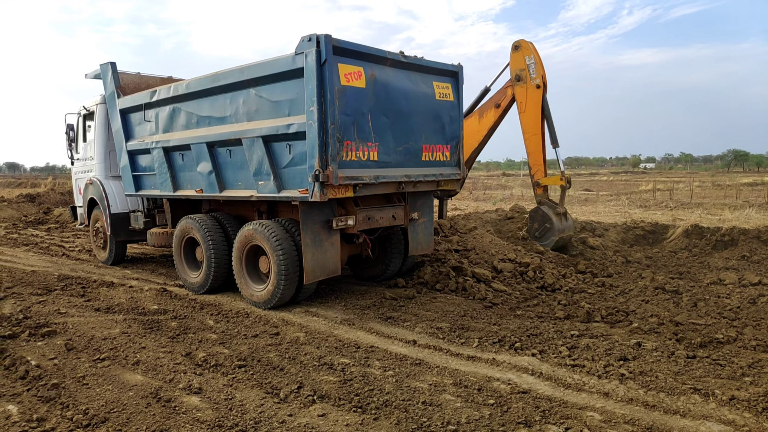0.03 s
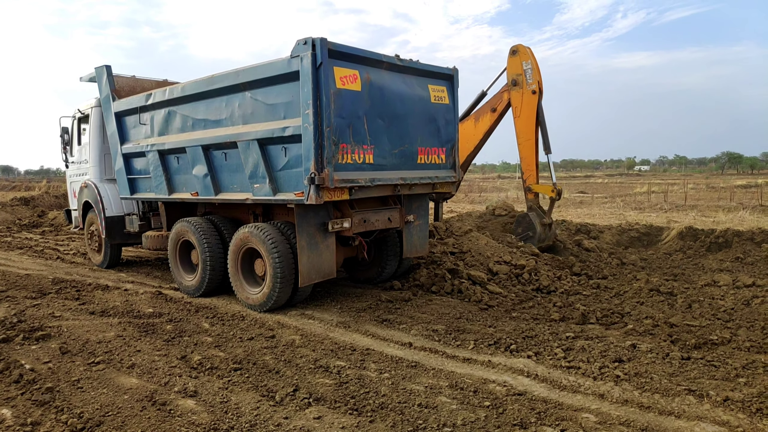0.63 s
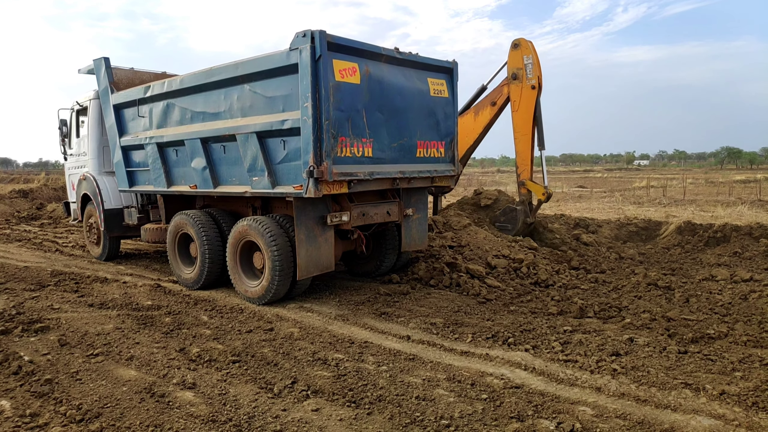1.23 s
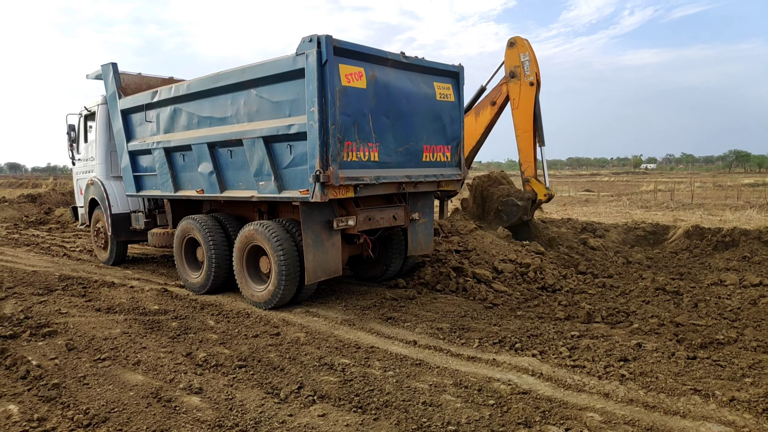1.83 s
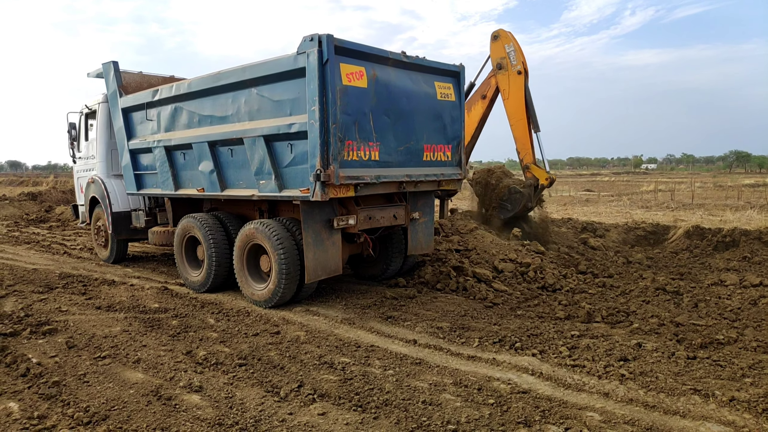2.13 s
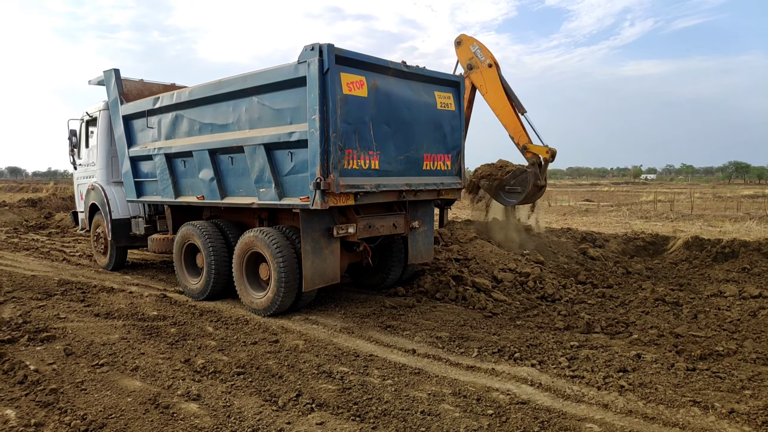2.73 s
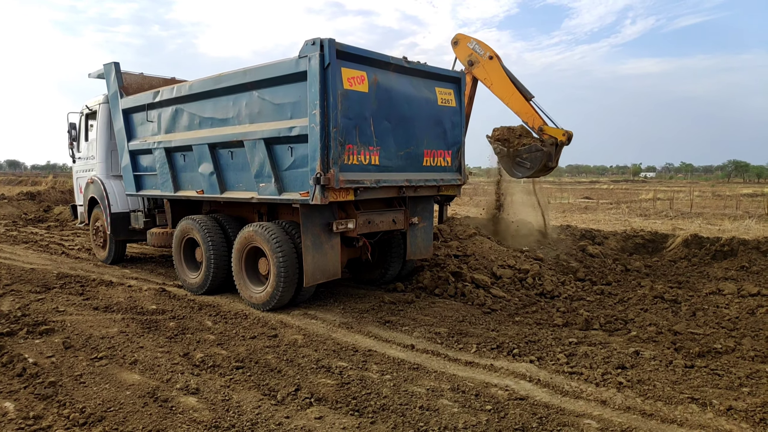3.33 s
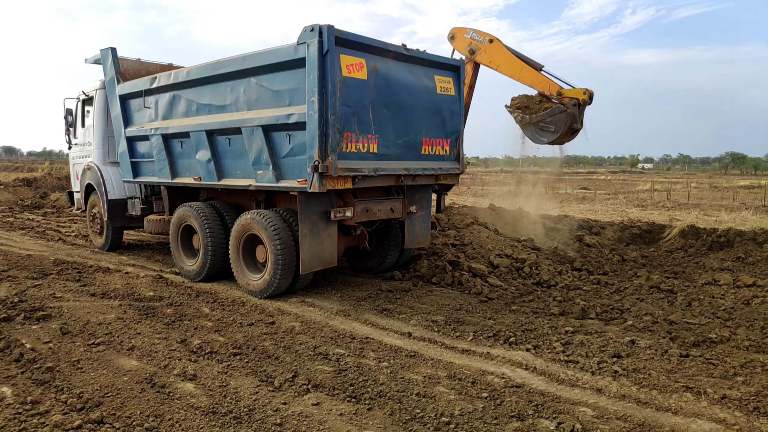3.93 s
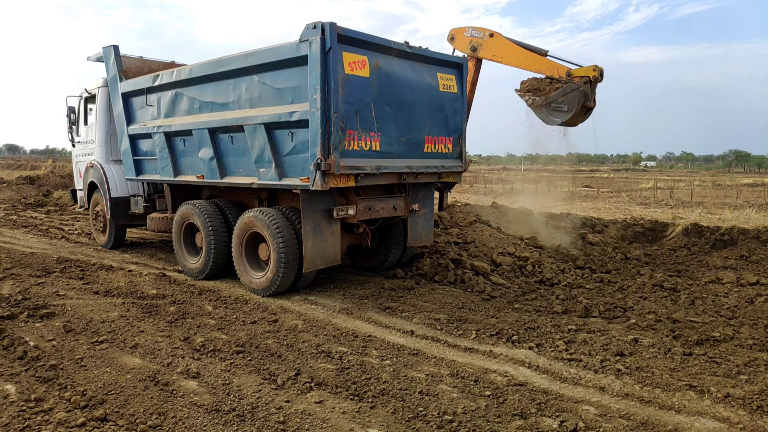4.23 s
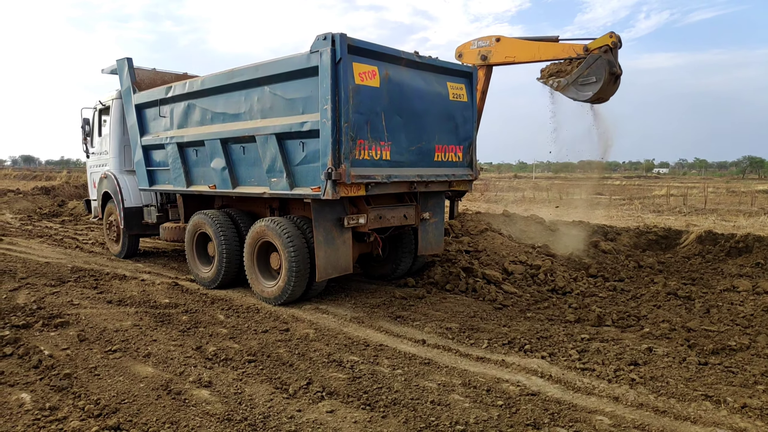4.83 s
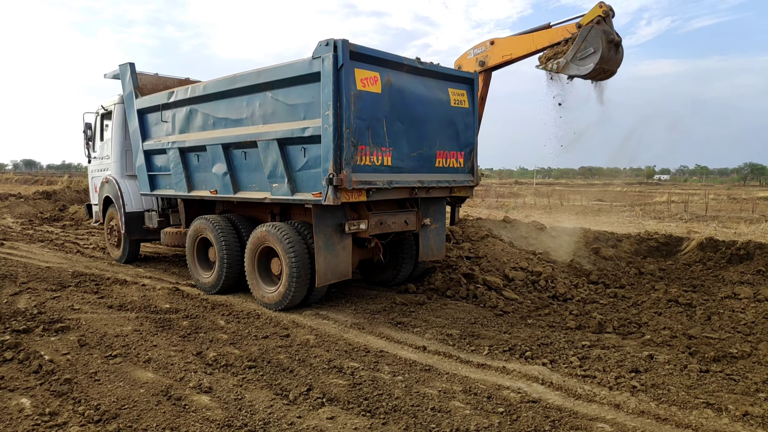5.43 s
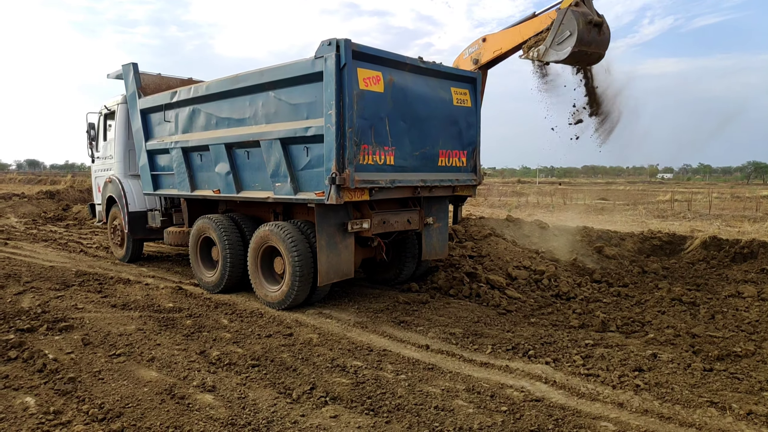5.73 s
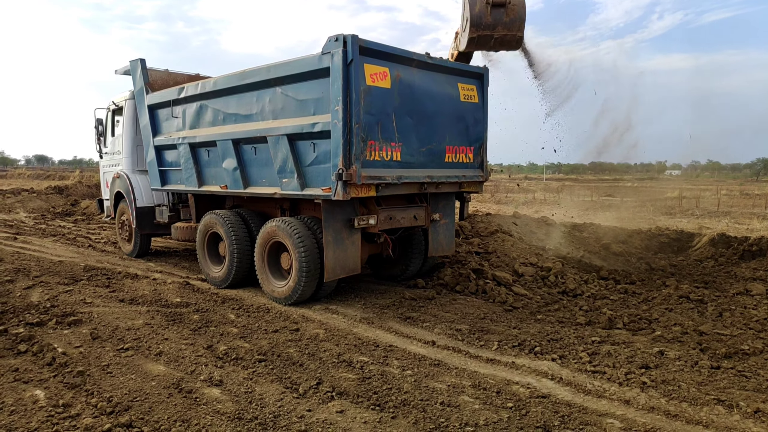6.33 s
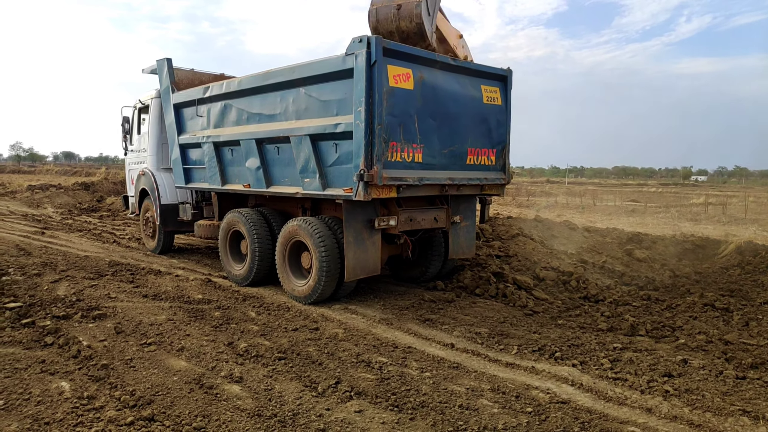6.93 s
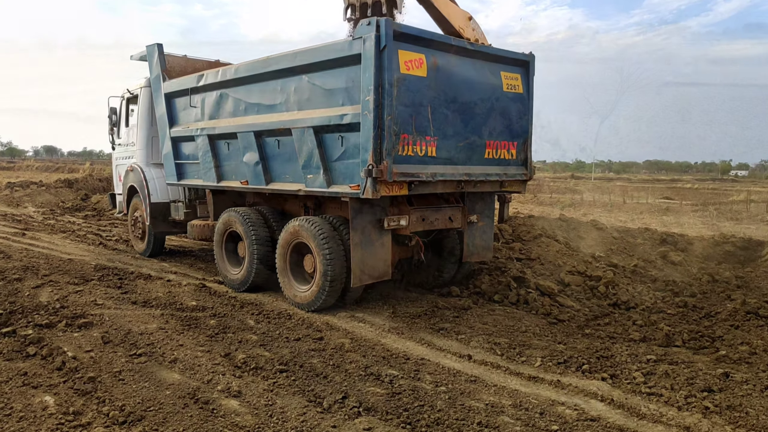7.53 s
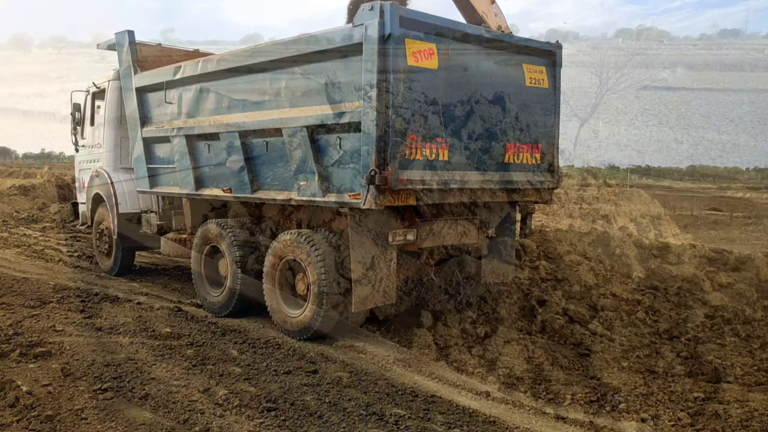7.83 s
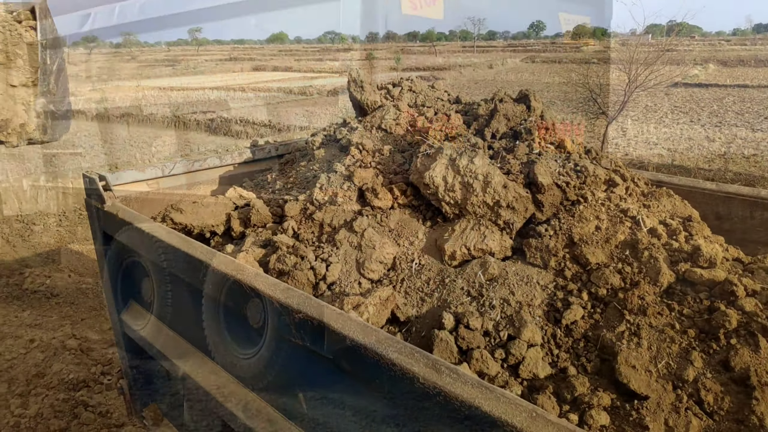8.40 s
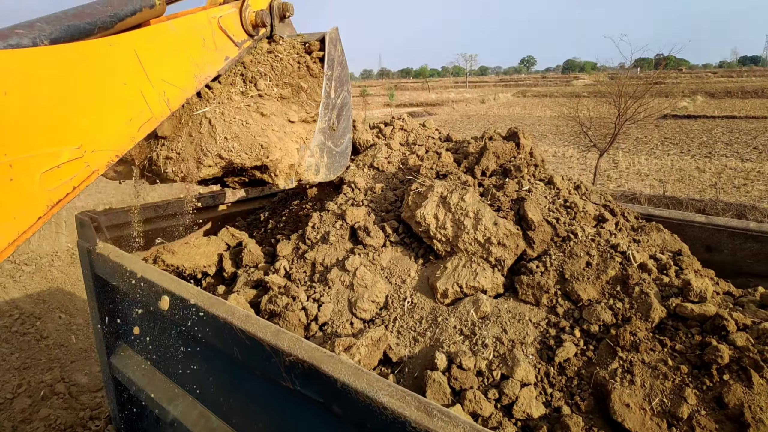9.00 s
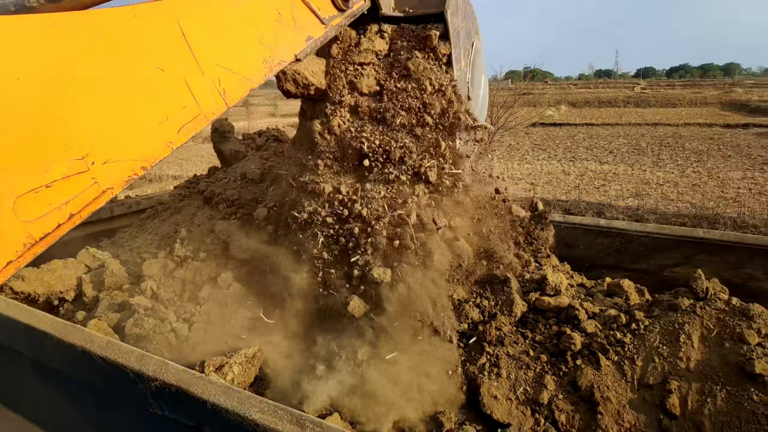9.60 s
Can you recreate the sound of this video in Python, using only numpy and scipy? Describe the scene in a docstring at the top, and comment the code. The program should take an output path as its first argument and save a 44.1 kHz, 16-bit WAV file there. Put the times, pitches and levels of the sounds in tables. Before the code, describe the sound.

A backhoe's diesel engine rumbles throughout, heard at first from a distance in an open field, slowing slightly and clattering harder whenever it takes a load. A faint hydraulic hiss runs underneath, and wind gusts buffet the microphone, most often between 4 and 7 seconds. Two short pivot squeaks come in the first second. The steel bucket knocks at about 2.2 and 2.5 seconds, then more lightly around 3.6. The engine labours from 6 seconds, with a clank near 6.6 and a soft trickle of dust and dirt. From about 7.6 to 8.7 seconds the engine grows into a louder, close, throbbing roar, with a dull knock along the way. At about 9.2 seconds dry soil spatters onto the steel truck bed, followed by thudding clods and two sharp bucket knocks around 9.5.

```python
"""Backhoe loader tipping soil.

A governed four-cylinder diesel works in an open field, heard from behind a tipper truck. Each lever
pull sags its speed and hardens its clatter. The bucket knocks, soil spatters, pivots squeak, oil
hisses in the valves and wind buffets the microphone. Near the end the far sound gives way to the
roar beside the machine as it tips soil into the truck."""
import sys
import numpy as np
from scipy import signal
from scipy.fft import rfft, irfft, next_fast_len
from scipy.io import wavfile

SR = 44100
rng = np.random.default_rng(int(sys.argv[2]) if len(sys.argv) > 2 else 0)


def store_pcm(level_fs):
    """Save levels as 16-bit WAV."""
    pcm = np.round(np.clip(level_fs, -1, 1) * 32767).astype(np.int16)
    wavfile.write(sys.argv[1], SR, np.atleast_2d(pcm).T)


N = 426006
T = np.arange(N) / SR
PORT_LAG_S = (.00025, -.00023)  # engine at the left microphone port after the right: far, near


def exhaust(firings, shares, sag_hz, boom_db_per_hz=1.1, usual_sag_hz=1.26, flutter_per_order=.055):
    """Exhaust and shaft tones; no two firings are alike, and high orders waver most."""
    # firing_order, far_db, near_db
    tones = [(0.751, -43, -61), (1, -26.5, -18.5), (2, -31.5, -22.5), (2.75, -42, -56), (3, -34.5, -21),
             (3.25, -50, -30), (3.5, -39.5, -26), (3.75, -47.5, -34.5), (4, -52, -27), (4.251, -49, -59),
             (4.501, -58, -43), (6, -49, -26.5), (8.25, -56, -61), (8.501, -58, -58), (9.5, -76, -41.5)]
    out = np.zeros((2, N))
    firings = firings + .006 * drift(20)  # timing jitter
    for order, far_db, near_db in tones:
        level = blend(shares, far_db, near_db)
        # the governor answers sag with more fuel: the lowest tones swell
        boom = amp(boom_db_per_hz * (sag_hz - usual_sag_hz) / order)
        waver = 1 + flutter_per_order * order * drift(4.6)
        out += np.sqrt(2) * level * boom * waver * np.cos(2 * np.pi * (order * firings + rng.random()))
    return out


def roar(firings, shares, body_db=(-34, -19), hiss_db=(-51.5, -29)):
    """Fan and casing noise and intake and exhaust hiss throb with each firing; panels and pipes sing."""
    # freq_hz, far_density_db, near_density_db
    body_spectrum = [(30, -37, -12), (91, -3, -10.5), (224, -2, -4), (296, -5, -5.5), (419, -4, 1.5),
                     (440, -10.5, -0.5), (620, -6.5, -3.5), (750, -6.5, -7.5), (807, -13, -6.5),
                     (1420, -13.5, -7.5), (1665, -23, -14), (2320, -42, -23.5), (3250, -30.5, -25.5)]
    # freq_hz, far_density_db, near_density_db
    hiss_spectrum = [(1800, -14, 2.5), (2670, 2.5, -0.5), (3420, -3, -4.5), (4630, 0, -2),
                     (6030, -1.5, -3.5), (7200, -1, -6), (8500, -1, -7.5), (11100, -3, -6.5),
                     (14000, -5, -6)]
    # panel and pipe modes: freq_hz, width_hz, far_db, near_db
    panels = [(1023, 37, -51, -67), (1983, 270, -51, -37), (2506, 150, -58, -56), (3740, 43, -69.5, -53),
              (5260, 430, -84, -43), (7870, 1300, -66.5, -41)]
    body_throb, hiss_throb = (.15, .3), (.03, .19)  # depth: far, near
    out, beat = np.zeros((2, N)), np.cos(2 * np.pi * firings)
    body_noise, hiss_noise, panel_noise = air(N), rng.standard_normal((2, N)), air(N)
    for k, share in enumerate(shares):  # far, then near
        body = shaped(body_noise, lambda f: amp(colour(body_spectrum, f, k + 1)) / (1 + (f / 3400) ** 8))
        body = amp(body_db[k]) * unit(body) * (1 + body_throb[k] * beat)
        hiss = shaped(hiss_noise, lambda f: amp(colour(hiss_spectrum, f, k + 1)))
        hiss = amp(hiss_db[k]) * unit(hiss) * (1 + hiss_throb[k] * beat)
        rings = shaped(panel_noise, lambda f: sum(
            amp(db[k]) * np.sqrt(SR / 2 / width_hz) * peak(f, hz, width_hz)
            for hz, width_hz, *db in panels))
        left, right = body + hiss + rings
        out += share * np.array([np.roll(left, round(PORT_LAG_S[k] * SR)), right])
    return out * amp(.43 * drift(7))


def clatter(firings, shares, idle_db=-54.5, fuel_rise_db=14, full_fuel_hz=2.83, near_gain_db=11.5):
    """Each firing raps the block, harder with more fuel; the four cylinders rap unequally."""
    # block modes: freq_hz, width_hz, gain_db, extra_db_per_knock_db
    block_modes = [(1400, 105, 0, 0), (1510, 100, -1, .5)]
    cylinder_db, spread_db, cluster_db = (1, -1, .5, -.5), 1.7, 1.7
    jitter_s, port_jitter_s, rattle_cycles = .0016, .00011, .35
    onsets = np.flatnonzero(np.diff(firings.astype(int)))
    chance = rng.standard_normal((len(onsets), 4))
    force = amp(spread_db * chance[:, 0] + np.resize(cylinder_db, len(onsets)))
    raps = np.zeros((2, N))
    for port in range(2):
        late_s = jitter_s * chance[:, 1] + port_jitter_s * chance[:, port + 2]
        raps[port, np.clip(onsets + (late_s * SR).astype(int), 0, N - 1)] = force
    rattle = unit(air(N) * np.exp(-(firings % 1) / rattle_cycles))  # loose parts after each rap
    drive = (unit(raps) + .98 * rattle) * amp(cluster_db * drift(9.7))
    fuel = np.tanh(load_sag_hz(ramp_s=.19, lead_s=.059) / full_fuel_hz)  # moves ahead of the speed
    nearness_db = 20 * np.log10(shares[0] + amp(near_gain_db) * shares[1])
    knock_db = idle_db + fuel_rise_db * fuel + nearness_db
    ring, power = 0, 0
    for k, (hz, width_hz, db, brighten) in enumerate(block_modes):
        gain = amp(db + brighten * (knock_db - knock_db.mean()))  # louder knock favours the upper mode
        mode = unit(shaped(drive, lambda f: 1 / (1 + 1j * (f - hz) / width_hz) ** 2))
        ring += (-1) ** k * gain * mode
        power += gain ** 2
    return ring / np.sqrt(power) * amp(knock_db)


def load_sag_hz(ramp_s, lead_s=0):
    """Drop in firing rate as lever pulls load the engine; overlapping pulls add."""
    # start_s, end_s, sag_hz
    pulls = [(-.22, .59, 3.94), (1.96, 2.78, 1.55), (3.4, 5.8, 1.11), (4.61, 4.94, .83), (6.03, 6.67, 4.04),
             (7.19, 7.68, 3.42), (8.1, 10.45, 1.46), (8.61, 9.52, 2.43)]
    t = T + lead_s
    return sum(sag_hz * (np.tanh((t - start_s) / ramp_s) - np.tanh((t - end_s) / ramp_s)) / 2
               for start_s, end_s, sag_hz in pulls)


def fan(firings, shares, waver_db=2):
    """Blade tones of the belt-driven fan follow the engine speed."""
    # firing_order, far_db, near_db
    blade_tones = [(4.35, -46.5, -50), (8.7, -47.5, -38)]
    out = np.zeros((2, N))
    for order, far_db, near_db in blade_tones:
        level = blend(shares, far_db, near_db) * amp(waver_db * drift(2))
        out += np.sqrt(2) * level * np.sin(2 * np.pi * order * firings)
    return out


def bucket_knocks(ring_t60_s=.11, clang_t60_s=.06, tail_t60_s=.61, tail_db=-19, attack_s=.00063):
    """A crunch of contact rings the steel of bucket and linkage; the treble dies first."""
    # start_s, level_db, tilt_db_per_octave, clang_ratio
    knocks = [(.342, -41, 1.5, 0.64), (2.154, -28.5, -6.5, 0.56), (2.514, -33, 3, 0.98),
              (2.524, -25.5, -1.5, 0.56), (2.534, -29, -15, 0.32), (3.465, -47, -2, 0.45),
              (3.561, -33.5, -0.5, 0.49), (3.656, -32.5, 1, 0.43), (6.551, -38, -5, .1),
              (6.571, -25.5, 0, 1.5), (6.598, -31, -5, 0.33), (8.363, -26, -15, .2), (9.447, -21, 1, 0.3),
              (9.54, -22, -0.5, 0.28)]
    # freq_hz, width_hz, gain_db
    steel_modes = [(500, 84, -2), (716, 170, -0.5), (1060, 210, 4.5), (1506, 71, 5), (2026, 240, 6),
                   (3000, 350, -9), (3730, 320, -13), (5000, 1600, -10.5), (7200, 4100, -19),
                   (10800, 5100, -19)]
    out, t = np.zeros((2, N)), T[:SR // 2]
    tail = amp(tail_db - 60 * t / tail_t60_s)
    for start_s, db, tilt_db, clang_ratio in knocks:
        crunch, ring, clang = air(len(t)), 0, 0
        for hz, width_hz, mode_db in steel_modes:
            gain = amp(mode_db + tilt_db * np.log2(hz / 2000))
            band = gain * shaped(crunch, lambda f: peak(f, hz, width_hz))
            mode_t60_s = ring_t60_s * np.sqrt(2000 / hz)
            ring += band * (amp(-60 * t / mode_t60_s) + tail)
            # a square blow sounds the strongest modes as clean tones
            clang += amp(mode_db) ** 3 * np.sin(2 * np.pi * hz * t) * amp(-60 * t / clang_t60_s)
        blow = (unit(ring) + clang_ratio * unit(clang)) * np.minimum(t / attack_s, 1)
        add(out, start_s, amp(db) * blow / np.std(blow[:, :SR // 100]))
    return out


def soil(grains_per_s=3500, attack_s=.0014, thud_width_hz=170, thud_t60_s=.3):
    """Dry crumbs spatter on steel, dust trickles off the bucket, clods thud into the truck."""
    # start_s, level_db, t60_s
    spills = [(6.768, -38, 0.17), (6.788, -40, 0.17), (9.19, -25, 0.45), (9.213, -21, 0.064),
              (9.236, -26.5, 0.22), (9.273, -30, 0.2), (9.302, -31, 0.3)]
    # freq_hz, density_db
    crumb_spectrum = [(2000, -28), (3500, -6), (4400, -4), (5200, 1.5), (6200, -4.5), (7200, -5.5),
                      (9000, -7.5), (13000, -3.5)]
    # start_s, level_db, pitch_hz
    clods = [(9.378, -19.5, 375), (9.385, -23, 844), (9.488, -42, 520), (9.52, -29, 856), (9.59, -23, 920)]
    spill_gain, t = np.zeros((2, N)), T[:SR]
    onset = np.minimum(t / attack_s, 1)
    for start_s, db, t60_s in spills:
        add(spill_gain, start_s, onset * amp(db - 60 * t / t60_s))
    grains = air(N) * (.34 + (rng.random(N) < grains_per_s / SR))  # ticks over a bed of dust
    crumbs = unit(shaped(grains, lambda f: amp(colour(crumb_spectrum, f))))
    dust = unit(shaped(grains, lambda f: f / np.hypot(f, 6000)))
    out = crumbs * spill_gain + dust * swell(peak_s=6.58, length_s=.76, level_db=-50)
    for start_s, db, hz in clods:
        thud = shaped(air(SR), lambda f: peak(f, hz, thud_width_hz))
        thud *= onset * amp(-60 * t / thud_t60_s)
        add(out, start_s, amp(db) * thud / np.std(thud[:, :SR // 40]))
    return out


def pivot_squeaks(pitch_wobble=.0064):
    """A dry pivot sticks and slips in brief, unsteady tones."""
    # start_s, length_s, start_hz, end_hz, level_db, octave_relative_db
    squeaks = [(0.356, 0.17, 995, 1037, -43, -5), (0.614, 0.074, 930, 986, -39.5, -15),
               (.83, 0.12, 3750, 3800, -61, -30), (1.198, 0.23, 3540, 3620, -66, -30),
               (6.102, .14, 3860, 3980, -62, -30), (7.58, .11, 11020, 10920, -57, -30)]
    out = np.zeros((2, N))
    for start_s, length_s, start_hz, end_hz, db, octave_db in squeaks:
        size = round(length_s * SR)
        pitch_hz = np.linspace(start_hz, end_hz, size) * (1 + pitch_wobble * drift(90)[:size])
        phase = 2 * np.pi * np.cumsum(pitch_hz) / SR
        tone = np.sin(phase) + amp(octave_db) * np.sin(2 * phase)
        add(out, start_s, amp(db) * np.sqrt(2 * np.hanning(size)) * tone)
    return out


def hydraulics(sag_hz, idle_db=-55, load_db_per_hz=.2, hidden_from_s=5.1, fade_db_per_s=1.5, surge_db=1):
    """Oil hisses in the valves, a little louder under load, fading once the arm is behind the truck."""
    # valve resonances: freq_hz, width_hz, gain_db
    valves = [(4900, 350, 4), (5810, 780, 1)]
    noise = rng.standard_normal((2, N))
    flow = shaped(noise, lambda f: sum(amp(db) * peak(f, hz, width_hz) for hz, width_hz, db in valves))
    hidden_db = fade_db_per_s * np.maximum(T - hidden_from_s, 0)
    return unit(flow) * amp(idle_db + load_db_per_hz * sag_hz - hidden_db + surge_db * drift(11))


def whistle(shares, pitch_hz=12820, width_hz=120, flicker_db=7):
    """A thin whistle of the running machine comes and goes."""
    band = shaped(rng.standard_normal((2, N)), lambda f: peak(f, pitch_hz, width_hz))
    flicker = amp(flicker_db * np.tanh(drift(10)))
    return unit(band * flicker) * blend(shares, far_db=-68, near_db=-51)


def wind(breeze_db=-33, low_hz=24, corner_hz=75, lump_db=2, flurry_db=1.1):
    """Gusts over a light breeze buffet the microphone, partly separately at each port."""
    # peak_s, length_s, level_db
    gusts = [(0.584, 0.24, -25.5), (1.09, 0.42, -22.5), (2.056, 0.14, -22.5), (2.496, 0.16, -28),
             (3.9, 0.37, -31.5), (4.444, 0.17, -20.5), (4.816, .14, -19), (5.24, 0.4, -21),
             (5.967, 0.23, -22.5), (6.316, 0.43, -21), (7.15, 0.7, -28.5), (7.858, 0.23, -28.5),
             (9.04, 0.11, -25), (9.42, .3, -42)]
    eddies = rng.standard_normal((2, N)) + .64 * rng.standard_normal(N)
    rumble = shaped(eddies, lambda f:
                    f / np.hypot(f, low_hz) / (1 + (f / corner_hz) ** 2.28) / (1 + (f / 380) ** 4))
    lumps = amp(lump_db * drift(45) + flurry_db * drift(7.2))
    strength = np.sqrt(amp(breeze_db) ** 2 + sum(swell(*gust) ** 2 for gust in gusts))
    lean_db = 3.04 + .12 * T  # to the right, more as the wind veers
    return unit(rumble * lumps) * strength * amp([-lean_db, lean_db])


def air(size):
    """Noise at two ports: alike in the bass, mostly unrelated in the treble."""
    # freq_hz, left_right_correlation
    likeness = [(60, 1), (290, 1), (620, 1), (1360, 0.16), (2950, 0.062), (14000, 0.2)]
    mid, side = rng.standard_normal((2, size))
    mid = shaped(mid, lambda f: np.sqrt((1 + colour(likeness, f)) / 2))
    side = shaped(side, lambda f: np.sqrt((1 - colour(likeness, f)) / 2))
    return np.array([mid + side, mid - side])


def drift(rate_hz, hop=100):
    """Random wander of rms 1, up to rate_hz."""
    noise = rng.standard_normal(N // hop + 2)
    coarse = shaped(noise, lambda f: 1 / (1 + (f / hop / rate_hz) ** 4))
    return unit(np.interp(np.arange(N) / hop, np.arange(len(coarse)), coarse))


def swell(peak_s, length_s, level_db, rise_share=.42):
    """Gain that rises to a peak and falls more slowly."""
    flank_s = length_s * np.where(T < peak_s, rise_share, 1 - rise_share)
    return amp(level_db) / np.sqrt(1 + ((T - peak_s) / flank_s) ** 4)


def blend(shares, far_db, near_db):
    """Gain from the far and near shares."""
    return shares[0] * amp(far_db) + shares[1] * amp(near_db)


def shaped(x, gain):
    """Filters by gain(freq_hz)."""
    size = next_fast_len(x.shape[-1], True)
    return irfft(rfft(x, size) * gain(np.fft.rfftfreq(size, 1 / SR)), size)[..., :x.shape[-1]]


def colour(rows, hz, column=1):
    """Reads a frequency table on a log axis."""
    rows = np.array(rows)
    return np.interp(np.log(hz + 1), np.log(rows[:, 0]), rows[:, column])


def peak(f, hz, width_hz):
    """Gain of a resonance with steep skirts."""
    return 1 / (1 + ((f - hz) / width_hz * 1.3) ** 2)


def amp(db):
    """Decibels to gain."""
    return 10 ** (np.asarray(db) / 20)


def unit(x):
    """Scales to rms 1."""
    return x / np.sqrt(np.mean(x ** 2) + 1e-20)


def add(mix, start_s, sound):
    """Mixes a sound in at start_s."""
    part = mix[:, round(start_s * SR):][:, :sound.shape[-1]]
    part += sound[..., :part.shape[1]]


def scene(free_firing_hz=64.67, flywheel_s=.24):
    """The engine under load, the work of the bucket, and the wind."""
    # listening position: time_s, far_share, near_share
    place = [(0, 0.98, 0.0005), (7.55, 0.94, 0.005), (7.9, 0.4, 0.28), (8.3, 0.36, 0.55),
             (8.75, 0.74, 0.99), (9.25, 0.82, 0.97), (9.66, 0.3, 0.99)]
    time_s, far, near = np.transpose(place)
    shares = np.interp(T, time_s, far), np.interp(T, time_s, near)
    sag_hz = load_sag_hz(ramp_s=flywheel_s)
    firings = np.cumsum(free_firing_hz - sag_hz) / SR  # running count
    lag_s = np.interp(shares[1], (0, .5), PORT_LAG_S)
    port_firings = np.array([firings - free_firing_hz * lag_s, firings])
    engine = exhaust(port_firings, shares, sag_hz) + fan(port_firings, shares)
    engine += roar(firings, shares) + clatter(firings, shares) + whistle(shares)
    return engine + hydraulics(sag_hz) + bucket_knocks() + soil() + pivot_squeaks() + wind()


def record(dry, cutoff_hz=14300):
    """Each port's colour, the right one shaded, then a low-pass."""
    # freq_hz, left_db, right_db
    ports = [(680, -2.5, -3), (1090, -3, -4.5), (1470, 1.5, -2), (2030, -2.5, -6), (3100, 2.5, 1.5),
             (6530, -0.5, .5), (8000, -0.5, -4), (9800, 2, -9), (14000, 0, -19)]
    heard = shaped(dry, lambda f: amp([colour(ports, f, 1), colour(ports, f, 2)]))
    lowpass = signal.firwin(801, cutoff_hz, window=("kaiser", 9), fs=SR)
    return signal.oaconvolve(heard, lowpass[None], "same")


dry = scene()
out = record(dry)
store_pcm(out)
```